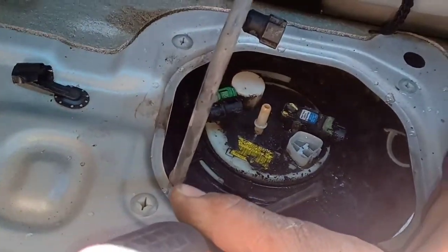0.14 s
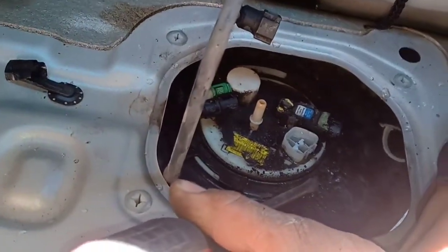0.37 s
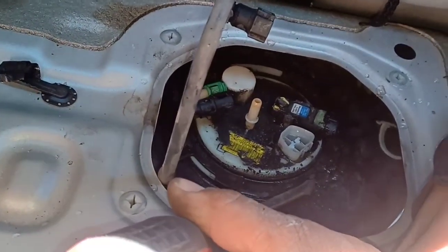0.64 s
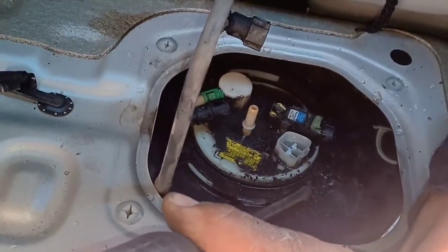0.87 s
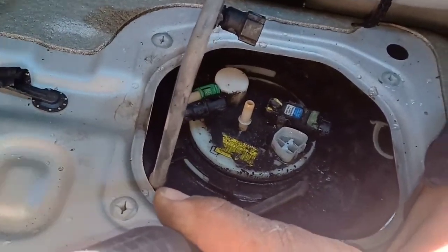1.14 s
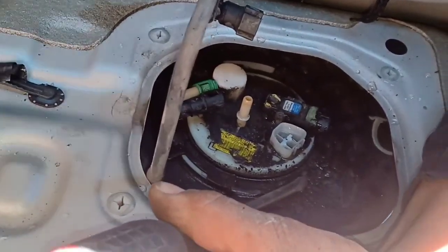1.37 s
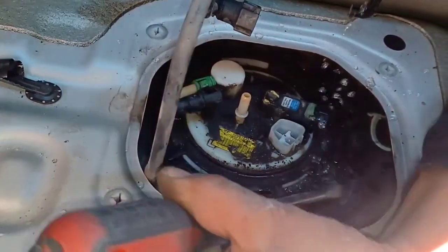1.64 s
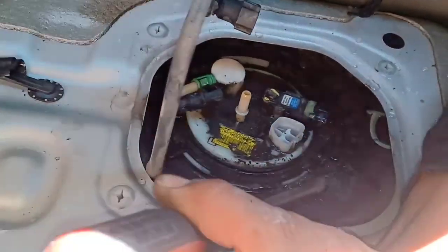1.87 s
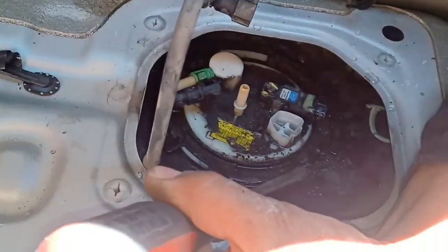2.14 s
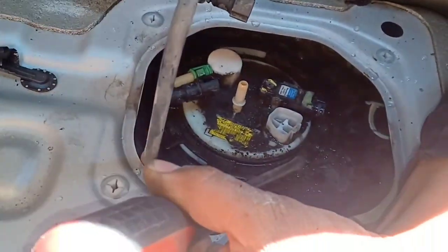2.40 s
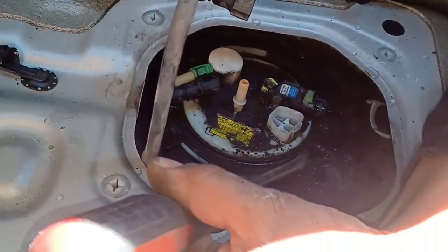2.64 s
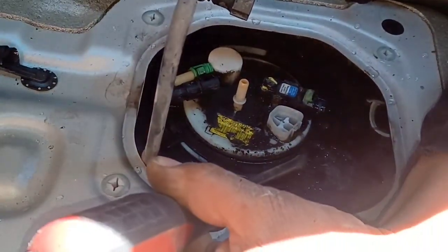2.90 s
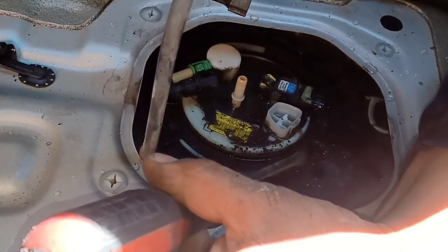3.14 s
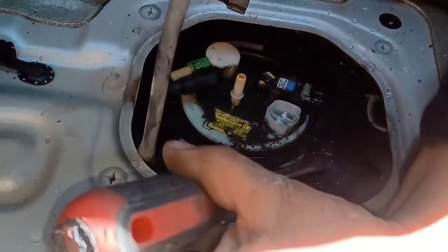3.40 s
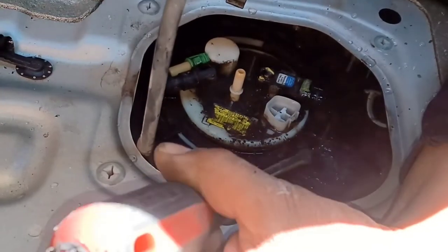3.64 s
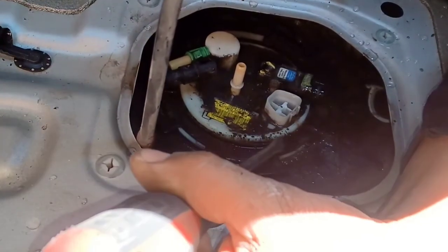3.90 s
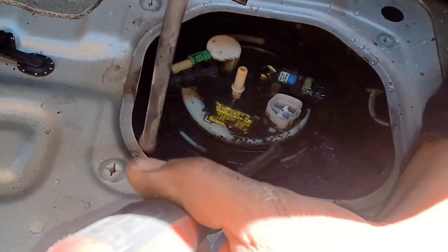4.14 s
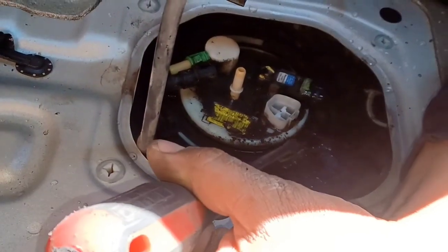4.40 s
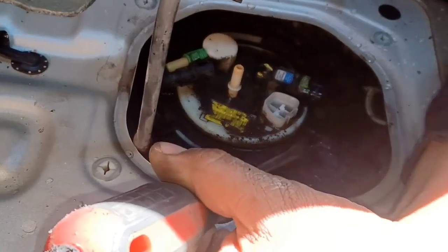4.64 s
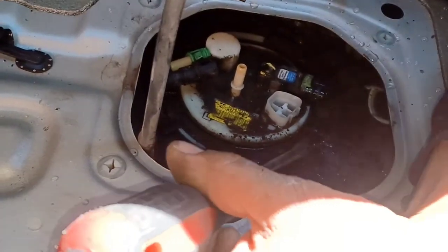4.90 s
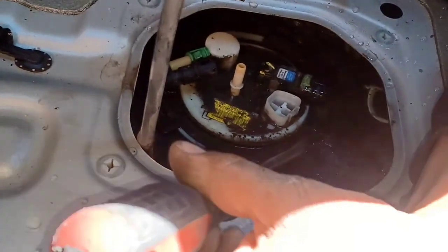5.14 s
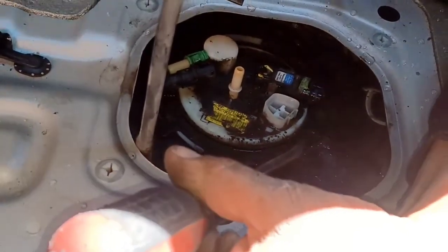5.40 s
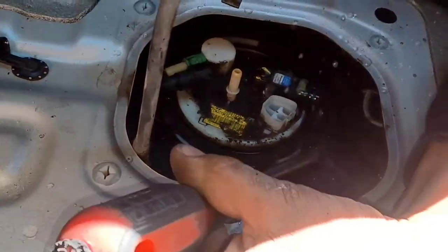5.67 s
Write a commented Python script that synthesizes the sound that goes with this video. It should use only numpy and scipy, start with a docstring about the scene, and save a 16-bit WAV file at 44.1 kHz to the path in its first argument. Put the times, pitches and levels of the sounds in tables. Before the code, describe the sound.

Close, dull metallic whacks boom through a car's floor and fuel tank at uneven intervals, among soft knocks, cloth rustle and faint outside rumble.

```python
"""A hammer drives a screwdriver against the steel ring on a fuel tank under a car's floor, close to a phone.
Each blow is an impulse with rebounds that excites decaying modes of ring and panels; tank and body heave after it.
Light taps, a knock's end at the start and the metallic ring of the last tick use the same modes, driven softly.
Small metallic ticks are hiss and buzz, one a faint long ring; a sleeve brushes as the arm is lifted (grainy noise).
Outside rumble is coloured noise, heard turned down after blows and slowly brought back; the phone limits the blows."""
import sys
import numpy as np
from scipy import signal
from scipy.fft import rfft, irfft
from scipy.io import wavfile
from scipy.ndimage import uniform_filter1d, minimum_filter1d

SR = 44100
rng = np.random.default_rng(int(sys.argv[2]) if len(sys.argv) > 2 else 0)


def transcribe(u):
    """Save the signal u as a 16-bit wav file named by the first command-line argument.

    u: samples, shape (n,) or (channels, n), limited to [-1, 1]; the rate is SR.
    q: integer samples, one column per channel.
    """
    v = np.clip(np.atleast_2d(u).T, -1, 1)
    q = np.round(v * 32767).astype(np.int16)
    wavfile.write(sys.argv[1], SR, q)


def to_linear_factor(level_db):
    """Convert decibel levels (scalar or array-like) to linear amplitude factors."""
    exponent = np.asarray(level_db, float) / 20
    return 10 ** exponent


N = 254898  # samples in the scene
SPAN = 1 << 16  # samples in the buffer of one event

# hammer blows and their rebounds: start_s, crack_db, drum_db, bright_db, contact_drag_s
BLOWS = [(1.52, -9, -10, -19, .005), (1.528, -28, -12.5, -32, .03), (1.559, -26, -13.5, -36.5, 0.031),
         (3.2598, -2, -2.5, -14, 0.0058), (3.2857, -18, -6, -16, .011), (3.3265, -20, -10, -21, .013),
         (3.3871, -33.5, -27, -48, 0.018), (5.498, -13.5, -11.5, -23, 0.0073),
         (5.508, -30, -13, -35, 0.042), (5.5283, -22, -10.5, -29, .016), (5.548, -29.5, -25, -43.5, 0.025)]
# light taps, with a knock's end at the start and the metallic ring of the last tick:
# start_s, crack_db, knock_db, drum_db, contact_drag_s
TAPS = [(0.002, -45, -41.5, -36.5, 0.0077), (0.4468, -42, -30.5, -46, 0.0053),
        (0.452, -41.5, -33.5, -35, 0.039), (1.858, -42, -41.5, -40, 0.016),
        (1.8874, -41.5, -46.5, -42.5, 0.01), (1.905, -49.5, -52, -47, 0.023),
        (2.1594, -56, -50.5, -44, .012), (2.197, -62, -52, -49.5, 0.0098), (2.489, -34, -27.5, -33, 0.013),
        (3.897, -56.5, -62.5, -52, 0.004), (3.9846, -60.5, -54.5, -51, .011),
        (4.533, -67, -59, -44.5, .016), (4.8323, -43, -32, -33.5, 0.0095), (5.7594, -30, -48, -50, .005)]
# modes of tank and floor panels: pitch_hz, relative_level_db, t60_s
PANEL_MODES = [(62, -6, 0.6), (88, 0, 0.13), (111.2, -1, 0.11), (135.4, -0.5, 0.092), (151.3, -16, .3),
               (205, -5, 0.34), (216.8, 1, 0.22), (249.6, 4.5, 0.18), (285.7, -4.5, 0.26),
               (329.6, -3, 0.26), (361, 0.5, 0.15), (411, -2.5, 0.086), (454.8, -4, 0.096),
               (545, -3.5, .06), (574, 7.5, 0.04), (625, -5.5, .04), (663, 1, 0.069), (710, 3, 0.05),
               (783, 2.5, 0.032), (880, -11.5, 0.067), (990, -12, 0.042), (1180, -13.5, 0.013)]
# modes of steel ring and tool: pitch_hz, relative_level_db, t60_s
RING_MODES = [(1100, -9.5, 0.004), (1286, 4.5, 0.025), (1450, -1, 0.004), (1670, 7, 0.015),
              (1850, -0.5, 0.005), (2230, -1.5, 0.012), (2500, -10.5, 0.018), (2870, -13, .015),
              (3570, -19, 0.0091), (4500, -16, .012), (5390, -9, .01)]
# spectrum of the parts rattling after a hit: frequency_hz, relative_density_db
RATTLE_SPECTRUM = [(470, -22), (800, -3.5), (1500, -5.5), (1680, -6.5), (2320, -11), (2910, -8),
                   (3880, -17), (4860, -11), (7730, -27.5), (12500, -21.5), (16000, -35.5)]
# balance of a hit: frequency_hz, left_minus_right_db
HIT_BALANCE = [(60, -1), (125, -10.5), (250, -1.05), (500, 0.5), (1000, -1.2), (2400, -4), (4400, -11.5),
               (8000, -8), (14000, -4)]
# likeness of a hit's noise at the two ports: frequency_hz, correlation (no unit)
HIT_LIKENESS = [(100, 0.86), (300, 0.92), (700, 0.15), (2000, 0.1), (8000, 0.2), (14000, 0.89)]
# heave of the tank and ring-on of the car body after each full blow: start_s, boom_db, body_tail_db
HEAVES = [(1.521, -11.5, -21), (3.26, -25.5, -21), (5.498, -12, -22)]
# panel modes left undamped after the tool jumps off: pitch_hz, relative_level_db, t60_s
FREE_MODES = [(156, -7, 1.78), (205, -5, 1.1), (221, -7, 0.99), (263.4, 1.5, 0.95), (265, -17.5, 4.7),
              (305, -4, 1.1), (336, -7, 0.97), (338, -12.5, 0.88), (408, -20.5, 1.5)]
# the shaft's own ring: pitch_hz, level_db, t60_s
SHAFT_MODES = [(2665, -56, .9), (8096, -59, .6)]
# small metallic ticks, and one faint long ring with hardly any hiss:
# start_s, level_db, ring_pitch_hz, lowest_hiss_hz, ring_t60_s
TICKS = [(1.6966, -48.5, 5170, 3830, .056), (1.8271, -56.5, 4500, 2314, 0.036),
         (1.8382, -56.5, 4000, 2500., 0.024), (1.8874, -51.5, 5830, 4030, 0.051),
         (3.483, -49, 5160, 2500., 0.021), (3.495, -56.5, 4500, 2500., 0.082),
         (3.5723, -66.5, 4500, 2500., 0.038), (3.698, -72, 3220, 2500., 0.04),
         (4.1931, -65.5, 4790, 2500., 0.058), (4.217, -63.5, 4850, 2000., .05),
         (4.3951, -70.5, 4020, 1600., 0.021), (4.526, -64.5, 4300, 3000., .04),
         (4.9636, -55, 5200, 3500., 0.099), (5.0056, -52.5, 4860, 2780, 0.036),
         (5.7595, -27, 4370, 2000., 0.033), (1.683, -59.5, 4720, 9000., 0.41)]
# strokes of the sleeve: centre_s, half_length_s, body_db, sizzle_db
STROKES = [(1.34, 0.14, -60, -68.5), (2.18, 0.24, -74, -75.5), (3.099, 0.11, -58.5, -66),
           (3.783, .035, -71.5, -76), (4.55, 0.035, -68.5, -81), (4.831, 0.056, -62, -76.5),
           (4.907, 0.019, -66, -64), (5.065, 0.11, -67.5, -71), (5.332, .07, -53, -61.5),
           (5.623, 0.027, -54.5, -63)]
# spectrum of the cloth: frequency_hz, relative_density_db
CLOTH_SPECTRUM = [(1180, -22), (2000, -10), (2640, -4), (2880, 2.5), (3840, -8), (6590, -7), (8190, -20),
                  (10700, -12.5), (14400, -22.5), (16000, -27)]
# balance of the cloth: frequency_hz, left_minus_right_db
CLOTH_BALANCE = [(60, -0.5), (110, -1.0), (200, -2.5), (380, 2.5), (700, -3), (1290, 8.5), (2380, -9.5),
                 (4400, -19), (8120, -5), (15000, -20.5)]
# level of the rumble's middle as heard: time_s, level_db
RUMBLE_LEVEL = [(0.0, -46.5), (0.9, -47), (1.45, -48), (1.72, -52), (1.92, -56), (2.32, -60), (2.86, -56.5),
                (3.1, -50), (3.35, -47.5), (3.55, -60), (4.25, -63), (4.55, -58), (5.02, -50), (5.3, -46.5),
                (5.78, -46.5)]
# spectrum of the rumble before the cabin resonances: frequency_hz, relative_density_db
AIR_SPECTRUM = [(15, -59.5), (25, -28), (50, -9.5), (108, 0.5), (157, -13.5), (229, -13), (301, -25.5),
                (451, -26.5), (503, -26.5), (936, -23), (1100, -23.5), (2910, -37), (4740, -52),
                (6560, -64), (16000, -69.5)]
# cabin resonances: pitch_hz, half_width_hz, boost_db
CABIN_PEAKS = [(610, 210, 6.5), (916, 39, 5.5), (1370, 83, 7), (2870, 140, 1.5)]
# likeness of the rumble at the two ports: frequency_hz, correlation (no unit)
AIR_LIKENESS = [(60, 1), (250, 1), (1000, 0.43), (3000, 0.16), (10000, 1)]
# balance of the rumble: frequency_hz, left_minus_right_db
AIR_BALANCE = [(60, -1.5), (110, -0.5), (200, -4), (380, 3.5), (700, -3.5), (1290, 1.5), (2380, -6.5),
               (4400, -19.5), (8120, -10), (15000, 3)]

BLOW_KNOCK_DB = -1.5  # a blow's knock against the mean of crack and drum
TAP_BRIGHT_DB = -12.5  # a tap's treble against its crack
BLOW_TOP_HZ, TAP_TOP_HZ = 20000, 8100  # a light tap is a softer contact: duller,
BLOW_SWELL_S, TAP_SWELL_S = 0.001, 0.008  # and slower to set the panels drumming
BLOW_TILT, TAP_TILT = -0.6, 1.3  # power of frequency that weights the upper panel modes
HEAVE_RISE_S, TAIL_T60_S, TAIL_HZ = 0.044, 0.55, 200
FREE_START_S, FREE_DB = 3.33, -23.5
WAVER_DB, GRIT_DB = 5.5, 3.6  # unevenness of free ring and rattle, before walk() smooths it
TICK_PAN_DB = -12  # left minus right
STROKE_EDGE = 2.2  # 1 pointed, 2 bell-shaped
AIRY_HZ, AIRY_FULL_DB = 11930, -61  # sizzle above this opens up only in strokes near this strength
BASS_DB, BASS_FOLLOW = -2, 0.77  # bass level = offset + share of the middle's dB
PORT_LAG = 16  # samples
MIC_HISS_DB = -84


def shape(points, hz):
    """Spectral interpolation: a short list is read on a log-frequency axis."""
    f, v = np.transpose(points)
    return np.interp(np.log(hz + 1), np.log(f), v)


def curve(rows, column=1):
    """Linear interpolation of one column over time."""
    rows = np.array(rows)
    return np.interp(np.arange(N) / SR, rows[:, 0], rows[:, column])


def pair(like, size):
    """Partial coherence: spectra of left and right noise mixed from shared and opposed parts."""
    mid, side = rfft(rng.standard_normal((2, size)))
    like = np.clip(like, 0, 1)
    return np.sqrt((1 + like) / 2) * mid + np.sqrt((1 - like) / 2) * side * np.array([[1], [-1]])


def lean(balance, hz):
    """Level difference between channels: gains of the left and right port over frequency."""
    return to_linear_factor(shape(balance, hz) * np.array([[0.5], [-0.5]]))


def unit(x):
    """Power normalisation to rms 1."""
    return x / np.sqrt(np.mean(x ** 2))


def peak(x, db):
    """Short-time power normalisation: the loudest 10 ms reach the level."""
    power = uniform_filter1d(np.mean(x ** 2, axis=0), size=SR // 100)
    return x * to_linear_factor(db) / np.sqrt(power.max())


def walk(rate):
    """Slow random modulation: levels held 1 / rate s and smoothed twice."""
    hold = int(SR / rate)
    steps = np.repeat(rng.standard_normal(N // hold + 1), hold)
    return uniform_filter1d(uniform_filter1d(steps, hold), hold)[:N]


def modes(table):
    """Modal decay: the spectrum of each mode's exponentially damped sine."""
    hz, db, t60 = (column[:, None] for column in np.transpose(table))
    t = np.arange(SPAN) / SR
    return rfft(to_linear_factor(db) * np.sin(2 * np.pi * hz * t) * np.exp(-np.log(1000) * t / t60))


def add(out, s, x, pan_db):
    """Superposition: a sound joins the mix at a time and side, fading out before its buffer ends."""
    start = int(s * SR)
    fade = np.clip(np.linspace(4, -1, SPAN), 0, 1)
    sides = to_linear_factor(np.array([[pan_db], [-pan_db]]) / 2)
    out[:, start:start + SPAN] += (x * fade * sides)[:, :N - start]


def strike(panels, ring, crack_db, knock_db, drum_db, bright_db, drag, top_hz, swell_s, tilt):
    """Forced modal response: a jolt and a dying shake drive the modes; grit rattles on in the treble."""
    t, hz = np.arange(SPAN) / SR, np.fft.rfftfreq(SPAN, 1 / SR)
    panel_hz = np.array(PANEL_MODES)[:, 0]
    ports = lean(HIT_BALANCE, hz)
    clean = (0.0074 / drag) ** 1.3
    # each mode gets its own share of the hit, a little different at the two ports
    count = len(PANEL_MODES) + len(RING_MODES)
    share_db = 2.0 * rng.standard_normal(count) + 3.7 * rng.standard_normal((2, count))
    share = rng.choice([-1, 1], count) * to_linear_factor(share_db)
    panel_share, ring_share = share[:, :len(PANEL_MODES)], share[:, len(PANEL_MODES):]

    # a dragging contact starts softly, lasts and stops; a clean one is all jolt and sets the parts rattling
    grit = irfft(pair(shape(HIT_LIKENESS, hz), SPAN)) * to_linear_factor(GRIT_DB * walk(500)[:SPAN])
    contact = (1 - np.exp(-t / (0.048 * drag))) * np.exp(-(t / drag) ** 1.57)
    shudder = rfft(grit * (contact + (0.056 + 0.12 * clean) * np.exp(-t / 0.042)))
    jolt = rfft(t * np.exp(-t / 0.00008))
    push = rfft(np.exp(-t / 0.00079))

    drum_modes = (panel_share * (panel_hz > 170) * (panel_hz < 390)) @ panels
    drum = irfft((push + 0.028 * shudder) * drum_modes * ports)
    drum = drum * (1 - np.exp(-t / swell_s))
    knock_modes = (panel_share * (panel_hz > 390) * panel_hz ** tilt) @ panels
    knock = irfft((push * clean + 0.38 * shudder) * knock_modes * ports)

    rattle = shudder * to_linear_factor(shape(RATTLE_SPECTRUM, hz)) * ports / (1 + (hz / top_hz) ** 4)
    ringing = peak(irfft(jolt * (ring_share @ ring) * ports), 0)
    crack = ringing * clean + peak(irfft(rattle / (1 + (hz / 4000) ** 8)), 0)
    # the treble dies fastest
    bright = irfft(rattle / (1 + (4000 / (hz + 1)) ** 8)) * (0.63 + np.exp(-t / 0.0046))
    body = peak(drum, drum_db) + peak(knock, knock_db)
    return body + peak(crack, crack_db) + peak(bright, bright_db)


def hits():
    """Contact stiffness: all hits drive the same modes, the softer rows of TAPS duller and slower."""
    out = np.zeros((2, N))
    panels, ring = modes(PANEL_MODES), modes(RING_MODES)
    for s, crack_db, drum_db, bright_db, drag in BLOWS:
        knock_db = (crack_db + drum_db) / 2 + BLOW_KNOCK_DB
        blow = strike(panels, ring, crack_db, knock_db, drum_db, bright_db, drag,
                      BLOW_TOP_HZ, BLOW_SWELL_S, BLOW_TILT)
        add(out, s, blow, 0)
    for s, crack_db, knock_db, drum_db, drag in TAPS:
        tap = strike(panels, ring, crack_db, knock_db, drum_db, crack_db + TAP_BRIGHT_DB, drag,
                     TAP_TOP_HZ, TAP_SWELL_S, TAP_TILT)
        add(out, s, tap, 0)
    return out


def heaves():
    """Inertia and modal overlap: the heavy tank starts slowly; many body modes blur into a dull dying roar."""
    out, t, hz = np.zeros((2, N)), np.arange(SPAN) / SR, np.fft.rfftfreq(SPAN, 1 / SR)
    tank_modes = modes([row for row in PANEL_MODES if row[0] < 170]).sum(0)
    tank = tank_modes / (1 + (60 / (hz + 1)) ** 4)
    for s, boom_db, tail_db in HEAVES:
        sway = rfft(irfft(pair(0.96, SPAN)) * t ** 2 * np.exp(-2 * t / HEAVE_RISE_S))
        dull = 1 / (1 + (hz / TAIL_HZ) ** 1.71) / (1 + (65 / (hz + 1)) ** 4)
        roar = irfft(pair(shape(HIT_LIKENESS, hz), SPAN) * dull)
        tail = roar * (1 - np.exp(-t / 0.018)) * np.exp(-np.log(1000) * t / TAIL_T60_S)
        add(out, s, peak(irfft(sway * tank), boom_db) + peak(tail, tail_db), 0)
    return out


def free_ring():
    """Low damping: once the tool jumps off, panels and shaft ring on; the panels waver as they do."""
    out = np.zeros((2, N))
    waver = [to_linear_factor(WAVER_DB * walk(22)[:SPAN]) for _ in FREE_MODES]
    rings = irfft(modes(FREE_MODES)) * waver
    sides = to_linear_factor(0.93 * rng.standard_normal((2, len(FREE_MODES))))
    shaft = irfft(modes(SHAFT_MODES).sum(0))
    add(out, FREE_START_S, peak(sides @ rings, FREE_DB) + shaft, 0)
    return out


def ticks():
    """Resonant filtering: a high-passed hiss and decaying noise narrowed round one pitch, as buzz or long ring."""
    out, t, hz = np.zeros((2, N)), np.arange(SPAN) / SR, np.fft.rfftfreq(SPAN, 1 / SR)
    for s, db, pitch_hz, lowest_hz, t60 in TICKS:
        noise = irfft(pair(0.33, SPAN))
        burst = rfft(noise * (np.exp(-t / 0.0026) + 0.11 * np.exp(-t / 0.012)))
        hiss = peak(irfft(burst / (1 + (lowest_hz / (hz + 1)) ** 6) / np.hypot(1, hz / 5000)), 0)
        # a longer ring is narrower in pitch, up to 0.2 s
        resonance = 1 / (1 + ((hz - pitch_hz) * min(t60, 0.2) / 40) ** 2)
        ring = irfft(rfft(noise * np.exp(-np.log(1000) * t / t60)) * resonance)
        add(out, s, peak(hiss + peak(ring, 0.16), db), TICK_PAN_DB)
    return out


def sleeve():
    """Friction noise: cloth on cloth gives grainy hiss, in body and sizzle, that swells with each stroke."""
    hz, t = np.fft.rfftfreq(N, 1 / SR), np.arange(N) / SR
    grain = rfft(irfft(pair(1.0, N), N) * to_linear_factor(2.3 * walk(300)))
    cloth = grain * to_linear_factor(shape(CLOTH_SPECTRUM, hz)) * lean(CLOTH_BALANCE, hz) / (1 + (2000 / (hz + 1)) ** 6)
    top = 1 / (1 + (8800 / (hz + 1)) ** 12)  # share of the sizzle
    airy = 1 / (1 + (AIRY_HZ / (hz + 1)) ** 12)  # its uppermost part
    centre_s, half_s, body_db, sizzle_db = np.transpose(STROKES)
    swell = np.exp(-np.abs((t - centre_s[:, None]) / half_s[:, None]) ** STROKE_EDGE)
    opening = to_linear_factor(np.minimum(sizzle_db - AIRY_FULL_DB, 0))
    low, high = unit(irfft([cloth * top * (1 - airy), cloth * top * airy], N))
    sizzle = low * (to_linear_factor(sizzle_db) @ swell) + high * ((to_linear_factor(sizzle_db) * opening) @ swell)
    body = unit(irfft(cloth * (1 - top), N)) * (to_linear_factor(body_db) @ swell)
    return sizzle + body


def rumble():
    """Cabin resonance colours outside noise, set to its heard level; the bass throbs and reaches the left first."""
    hz = np.fft.rfftfreq(N, 1 / SR)
    cabin_db = sum(db / (1 + ((hz - f) / width) ** 2) for f, width, db in CABIN_PEAKS)
    colour = to_linear_factor(shape(AIR_SPECTRUM, hz) + cabin_db) * lean(AIR_BALANCE, hz)
    air = pair(shape(AIR_LIKENESS, hz), N) * colour
    bass_share = 1 / (1 + (hz / 330) ** 6)
    level_db = curve(RUMBLE_LEVEL)
    bass = unit(irfft(air * bass_share, N)) * to_linear_factor(BASS_DB + BASS_FOLLOW * level_db + 3.4 * walk(11))
    middle = unit(irfft(air * (1 - bass_share), N)) * to_linear_factor(level_db + 0.38 * walk(10))
    left, right = bass + middle
    return np.array([left, np.roll(right, PORT_LAG)])


def scene():
    """Superposition of all sources at the phone."""
    return hits() + heaves() + free_ring() + ticks() + sleeve() + rumble()


def low_pass(x):
    """Removes everything above the highest recorded frequency."""
    return signal.sosfilt(signal.butter(12, 16470, fs=SR, output="sos"), x)


def record(dry):
    """Gain reduction: the microphone hisses and drops deep bass; a look-ahead limiter holds the blows down."""
    x = dry + to_linear_factor(MIC_HISS_DB) * rng.standard_normal(dry.shape)
    x = signal.sosfilt(signal.butter(5, 52, "high", fs=SR, output="sos"), x)
    room = np.minimum(1, 0.96 / (np.abs(x).max(0) + 1e-9))
    gain = uniform_filter1d(minimum_filter1d(room, size=SR // 50), size=SR // 100)
    return low_pass(x * gain)


dry = scene()
out = record(dry)
transcribe(out)
```